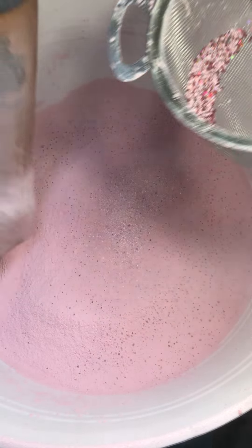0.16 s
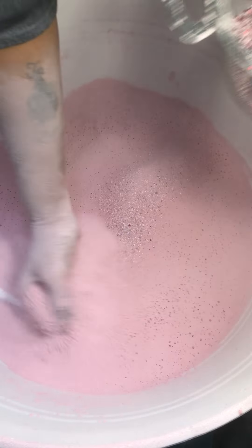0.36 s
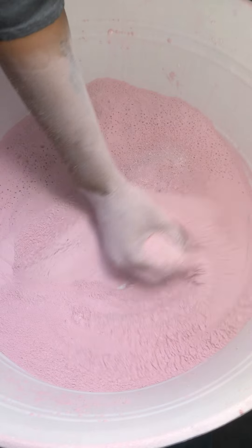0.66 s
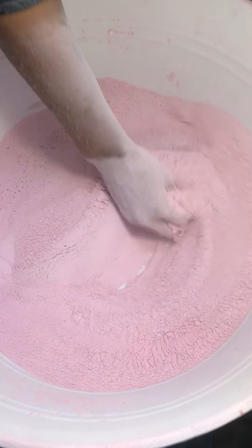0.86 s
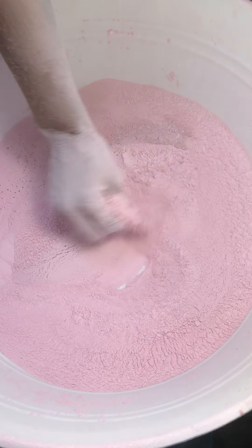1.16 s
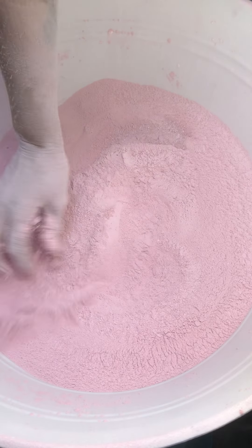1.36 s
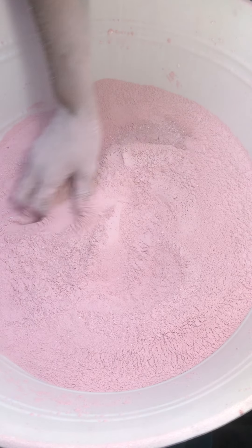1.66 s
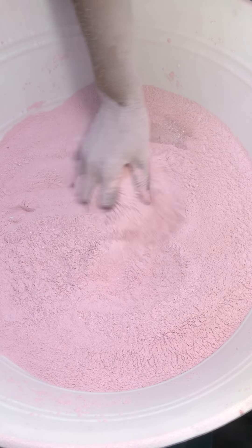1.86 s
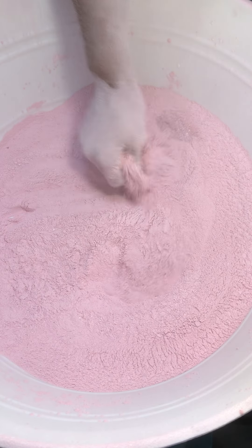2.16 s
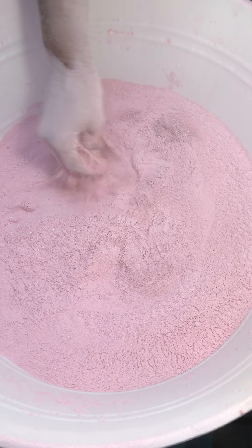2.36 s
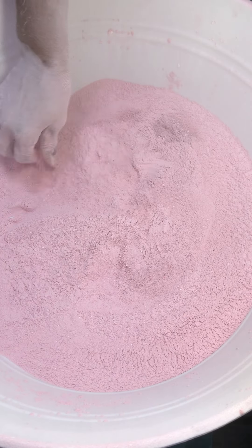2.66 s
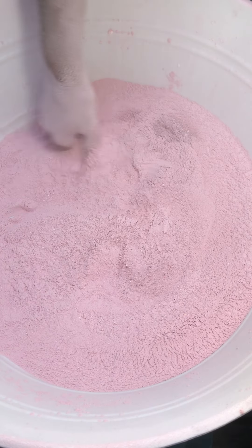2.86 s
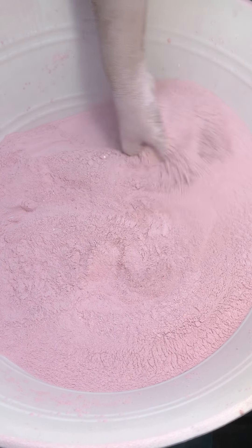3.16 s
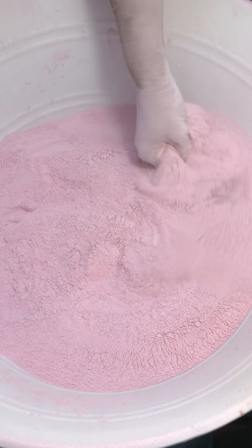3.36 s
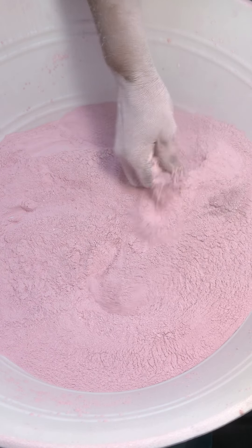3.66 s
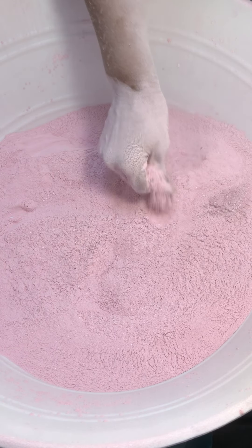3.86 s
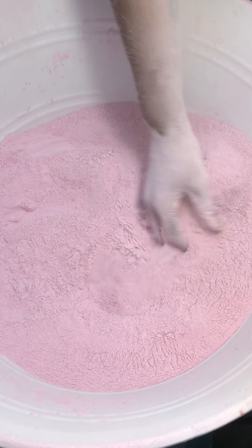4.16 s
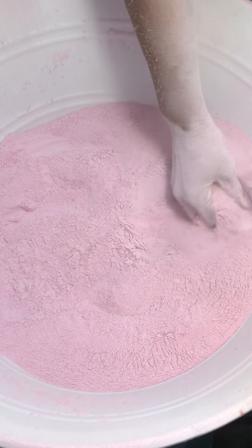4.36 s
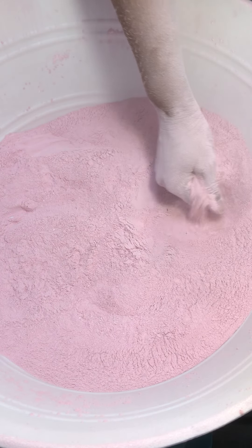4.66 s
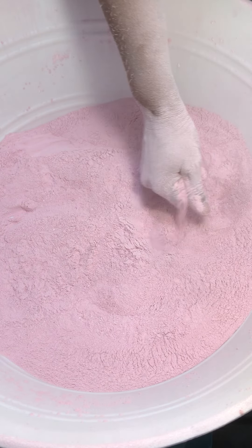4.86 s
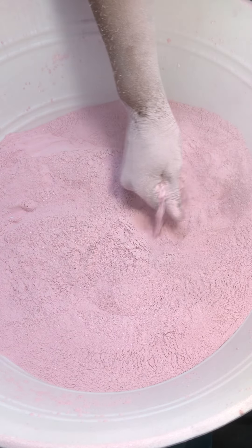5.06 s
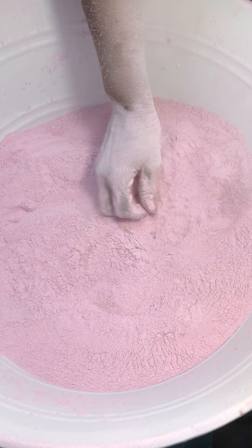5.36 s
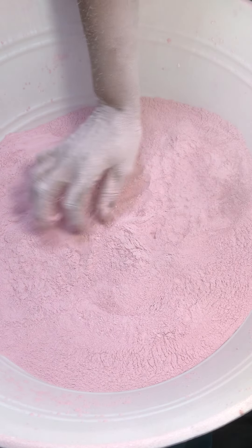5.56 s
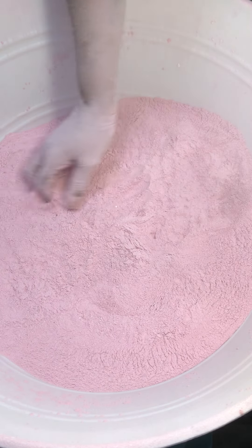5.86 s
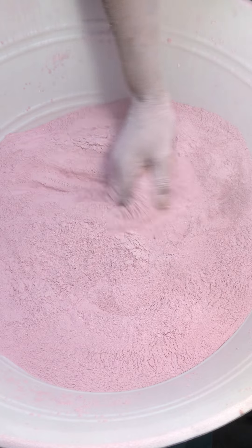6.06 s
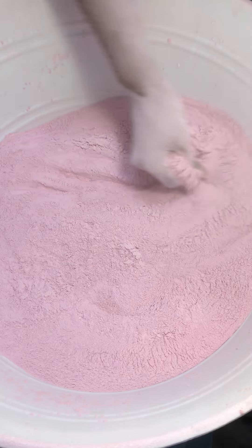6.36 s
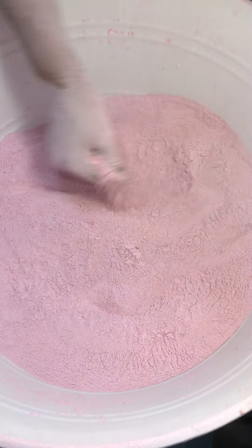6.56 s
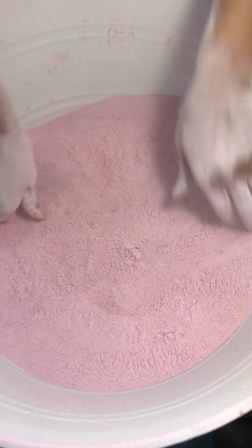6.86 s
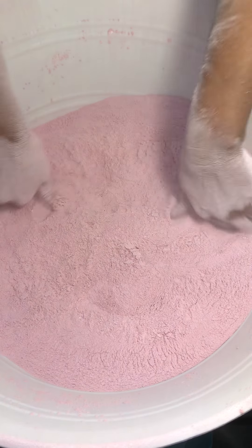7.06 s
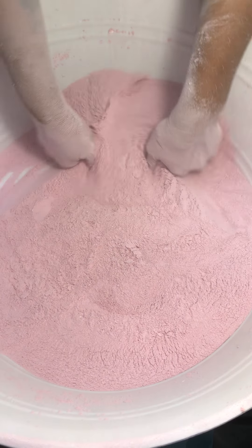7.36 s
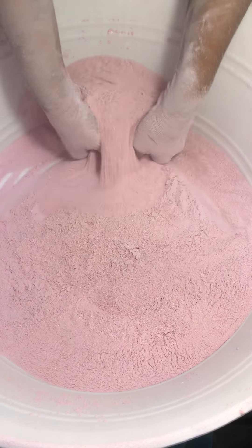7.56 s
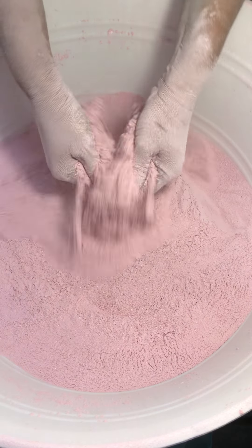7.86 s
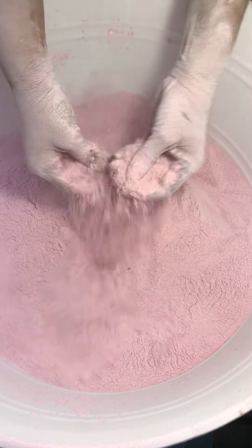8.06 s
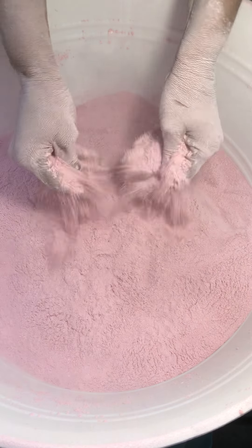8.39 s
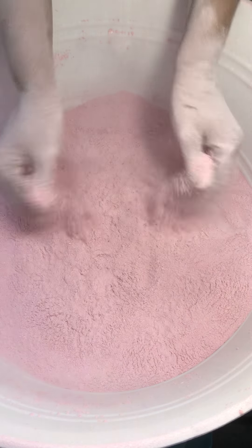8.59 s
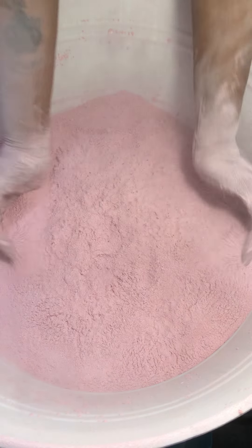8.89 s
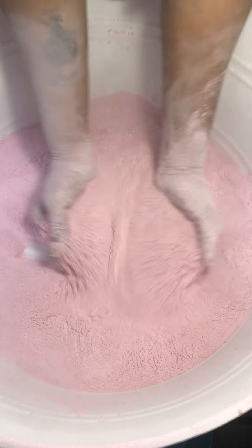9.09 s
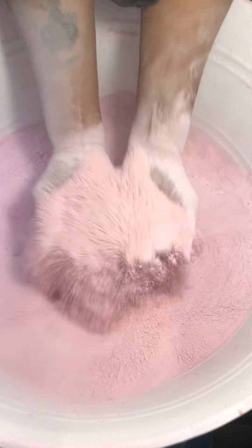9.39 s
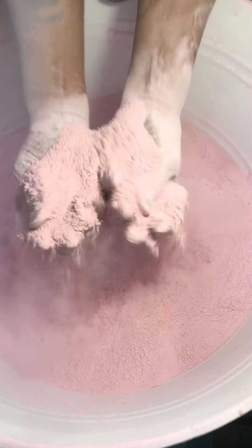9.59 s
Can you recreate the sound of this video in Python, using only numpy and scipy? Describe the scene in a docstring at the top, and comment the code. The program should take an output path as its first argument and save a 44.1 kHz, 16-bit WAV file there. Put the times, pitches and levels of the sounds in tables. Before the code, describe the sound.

Soft, gritty swishes of powder stirred by hand in a plastic tub, as a metal sieve rattles and knocks hard once midway.

```python
"""Chalk powder in a plastic basin

Close by, hands stir, scoop and crumble fine chalk: stick-slip friction hisses and scrapes, lumps tick,
and knuckles excite the damped modes of the wide basin. Further off a metal sieve is moved, knocked hard
and set down, rattling and ringing. The hard-walled room reverberates and hums; its floor rumbles."""
import sys
import numpy as np
from scipy import signal
from scipy.fft import rfft, irfft, next_fast_len
from scipy.io import wavfile
from scipy.ndimage import uniform_filter1d, map_coordinates

SR = 44100
rng = np.random.default_rng(int(sys.argv[2]) if len(sys.argv) > 2 else 0)


def persist_wave(psi):
    """Save psi, clipped to +-1, as 16-bit WAV."""
    counts = np.round(np.clip(psi, -1, 1) * 32767).astype(np.int16)
    wavfile.write(sys.argv[1], SR, np.atleast_2d(counts).T)


N = 429082


def amp(db):
    """Amplitude ratio of a level in dB."""
    return 10 ** (np.asarray(db) / 20)


def unit(x):
    """Normalisation to rms 1."""
    return x / np.sqrt(np.mean(x ** 2) + 1e-20)


def filtered(x, response):
    """Linear filtering: the spectrum of x times a complex frequency response."""
    size = next_fast_len(len(x) + 8192)
    return irfft(rfft(x, size) * response(np.fft.rfftfreq(size, 1 / SR)), size)[:len(x)]


def coloured(x, spectrum):
    """Spectral shaping by (f/Hz, level/dB) points on a log frequency axis, at rms 1."""
    hz, db = np.transpose(spectrum)
    return unit(filtered(x, lambda f: amp(np.interp(np.log(f + 1), np.log(hz + 1), db))))


def wobble(rate):
    """Smooth random modulation with rate knots a second."""
    knots = rng.standard_normal(int(N * rate / SR) + 4)
    return map_coordinates(knots, [np.arange(N) * rate / SR])


def add(track, s, sound):
    """Superposition of a sound on the track at s seconds."""
    part = track[round(s * SR):][:len(sound)]
    part += sound[:len(part)]


def grit(share, spread_db, patchy_db):
    """Granular noise: scattered louder grains, with gain patchy in time and frequency."""
    grains = rng.standard_normal(N) * amp(spread_db * rng.random(N) * (rng.random(N) < share))
    spectra = signal.stft(grains, nperseg=512)[2]
    patches = uniform_filter1d(uniform_filter1d(rng.standard_normal(spectra.shape), 7, 0), 8, 1)
    return signal.istft(spectra * amp(patchy_db * unit(patches)), nperseg=512)[1][:N]


def swells(rows):
    """Incoherent addition: the gain of (t/s, rise/s, hold/s, fall/s, level/dB) swells summed in power."""
    fade_db = -27.5  # one rise before and one fall after the hold
    t = np.arange(0, N / SR + .01, .002)
    power = 0
    for s, rise, hold, fall, db in rows:
        distance = np.maximum((s - t) / abs(rise), (t - s - abs(hold)) / abs(fall))
        power += amp(db + np.clip(fade_db * distance, -120, 0)) ** 2
    return np.interp(np.arange(N) / SR, t, np.sqrt(power))


def basin(f):
    """Modal superposition: the plastic wall responds as a sum of broad resonances."""
    # f/Hz, bandwidth/Hz, level/dB
    modes = [(174, 59, -5), (212, 35, 1.5), (253, 40, -2.5), (317, 45, -2), (352, 50, -3.5), (420, 65, -4),
             (590, 81, -10.5)]
    return sum((-1) ** k * amp(db) * 1j * f * width / (hz * hz - f * f + 1j * f * width)
               for k, (hz, width, db) in enumerate(modes))


def hand_pressure():
    """Friction grows with load: gains of fine powder, skin, ploughing and wall, bass trailing treble."""
    # hand strokes: t/s at full pressure, rise/s, hold/s, fall/s, then level/dB of each of the four layers
    sweeps = [(0.0, .01, 0.049, 0.26, -71, -63, -64.5, -63),
              (0.194, 0.9, 0.055, 0.86, -58, -62.5, -60, -64.5),
              (0.546, 0.27, 0.2, 0.17, -68, -65, -62, -66),
              (0.742, 0.25, 0.034, 0.34, -59.5, -87, -59.5, -88),
              (0.845, 0.14, 0.084, .12, -77, -89, -59.5, -74), (1.173, .4, 0.052, 0.53, -84, -70, -79, -72),
              (1.615, 0.23, 0.062, 0.28, -59.5, -63, -61, -59.5),
              (1.739, 0.15, 0.029, 0.34, -61.5, -72, -57, -51.5),
              (2.106, 0.14, 0.049, 0.41, -62, -64.5, -61, -64.5),
              (2.468, 0.39, 0.11, 0.32, -76, -69, -60.5, -61.5),
              (2.718, .04, 0.18, 0.19, -68, -60.5, -59.5, -67),
              (2.897, 0.066, 0.15, .2, -60, -64.5, -58, -63), (3.23, 0.17, 1, .5, -89, -92, -73, -69.5),
              (3.847, 0.18, 0.047, 0.3, -66.5, -63.5, -66.5, -70.5),
              (4.102, 0.25, 0.14, 0.6, -68.5, -68, -61.5, -59),
              (4.426, 0.23, 0.086, 0.23, -68, -67.5, -64.5, -63.5),
              (4.663, .06, 0.12, 0.27, -68, -70, -62.5, -68),
              (4.824, .08, 0.028, 0.3, -66.5, -65.5, -52.5, -51),
              (4.989, .15, 0.35, 1, -65, -71, -56, -54.5), (5.864, 0.11, 0.069, 0.26, -57, -59, -62.5, -61),
              (6.015, 0.18, 0.037, 0.43, -63, -89.5, -57, -59.5),
              (6.394, 0.33, 0.19, 0.63, -81, -88, -75.5, -72),
              (6.52, 0.12, 0.072, 0.069, -68, -65.5, -87, -80.5),
              (6.891, 0.16, 0.087, .3, -60.5, -72, -59.5, -62),
              (7.084, 0.28, 0.35, .17, -57, -56.5, -57.5, -62),
              (7.846, 1, 0.075, 0.59, -83, -87, -71, -64.5),
              (8.449, 0.54, 0.089, .15, -76, -63.5, -79.5, -72),
              (8.914, 0.11, 0.11, 0.39, -61, -61.5, -59.5, -60.5),
              (9.092, 0.22, 0.091, 0.26, -60, -65, -60.5, -60),
              (9.486, 0.55, 0.18, 0.23, -79.5, -81, -76.5, -67.5)]
    # fingertips flicking powder off: t/s at peak, rise/s, fall/s, skin level/dB, fine powder level/dB
    flicks = [(1.11, 0.12, 0.074, -64, -66.5), (1.47, .02, 0.068, -72.5, -64.5),
              (4.135, .03, .06, -68, -60), (4.575, .01, .04, -68, -74), (1.177, .01, 0.13, -68, -63),
              (1.256, 0.013, 0.088, -75, -75), (1.33, 0.011, .12, -71, -69),
              (2.3, 0.084, 0.046, -57, -58.5), (2.368, 0.017, .06, -58, -64),
              (2.49, 0.067, 0.075, -51, -62), (2.6, 0.037, .05, -56.5, -68), (3.49, 0.085, .1, -70, -63.5),
              (3.635, 0.049, 0.084, -59, -62), (3.71, 0.042, 0.069, -68, -63.5),
              (3.94, 0.046, 0.07, -68, -77), (5.07, 0.034, 0.27, -52.5, -62), (5.7, .04, 0.053, -70.5, -83),
              (6.35, 0.046, .06, -81, -79), (6.63, .03, .03, -68, -71), (6.735, 0.012, .015, -76, -84.5),
              (7.76, .04, 0.043, -81, -72), (8.08, .015, .06, -61, -69), (8.565, .03, .03, -55.5, -76),
              (9.285, .03, .03, -68, -78), (9.41, 0.048, .03, -68, -72), (9.645, .02, .02, -74.5, -83.5),
              (9.71, 0.022, .03, -74, -78)]
    # delay of each layer, as a share of the stroke's rise
    lags = (0.0, -.05, 0.055, 0.13)
    # hold of each layer, as a share of the stroke's hold
    holds = (1.03, 0.93, 1.054, 1.2)
    layers = [[(s + lag * rise, rise, share * hold, fall, db[k]) for s, rise, hold, fall, *db in sweeps]
              for k, (lag, share) in enumerate(zip(lags, holds))]
    layers[0] += [(s, rise, 0, fall, fine_db) for s, rise, fall, _, fine_db in flicks]
    layers[1] += [(s, rise, 0, fall, skin_db) for s, rise, fall, skin_db, _ in flicks]
    return [swells(rows) for rows in layers]


def hand_strokes():
    """Stick-slip friction: grains slide under the hands, and the push drives the basin's modes."""
    # spectrum of rubbing skin: f/Hz, level/dB
    skin_spectrum = [(2500, -29), (5000, -4), (8000, 1.5), (11000, -3), (16000, 0.5)]
    # spectrum of ploughed powder: f/Hz, level/dB
    coarse_spectrum = [(350, -8.5), (700, 3), (1300, 3.5), (2500, -1), (4000, -14.5), (8000, -33.5),
                       (16000, -51.5)]
    # spectrum of fine powder: f/Hz, level/dB
    fine_spectrum = [(1200, -25.5), (2500, 0.5), (4000, 5.5), (6500, 0), (9000, -7.5), (10500, -16),
                     (16000, -33.5)]
    fine, skin, plough, load = hand_pressure()
    slip = wobble(35)  # shared by skin and powder
    rub = skin * amp(1.1 * slip + 1.5 * wobble(90)) * coloured(grit(.05, 12, 2.5), skin_spectrum)
    powder = amp(.8 * slip) * grit(share=0.018, spread_db=14, patchy_db=2.17)
    drag = plough * coloured(powder, coarse_spectrum) + fine * coloured(powder, fine_spectrum)
    wall = unit(filtered(amp(1.6 * wobble(40)) * rng.standard_normal(N), basin))
    return rub + drag + load * wall


def room_hum():
    """Stationary noise: the low hum and faint hiss of the room."""
    # background spectrum: f/Hz, level/dB
    spectrum = [(12, -53.5), (20, -17), (55, -13.5), (123, -1), (187, 5), (337, -11), (923, -13),
                (1530, -13.5), (3340, -23), (9400, -26), (11400, -30), (14700, -29.5), (16000, -30.5)]
    return amp(-68.5) * coloured(rng.standard_normal(N), spectrum)


def tap_ticks_and_squeak():
    """Damped oscillation: each burst decays around one sagging pitch; the shortest are mostly noise."""
    # a ringing tap of the sieve being set aside (0.126-0.157 s), chalk ticks, and a short, stuttering
    # squeak near 3 kHz (2.886-2.945 s): t/s, level/dB, f/Hz, T60/s
    bursts = [(.097, -58, 3670, .02), (.126, -37.5, 3000, 0.012), (.129, -39.5, 384, 0.069),
              (.131, -41, 747, 0.056), (.157, -39.5, 575, 0.037), (.254, -50, 4080, .02),
              (.848, -40, 1590, 0.026), (.875, -38.5, 1170, 0.029), (1.517, -50, 2980, 0.01),
              (2.687, -46, 1270, 0.037), (2.69, -44, 477, 0.04), (2.713, -50, 6600, 0.031),
              (2.75, -38, 870, 0.019), (2.808, -44.5, 1450, 0.046), (2.864, -41, 550, 0.032),
              (2.886, -41, 3200, 0.029), (2.892, -43, 3550, 0.026), (2.911, -36, 3100, 0.033),
              (2.923, -36, 2950, 0.042), (2.927, -39.5, 2750, 0.035), (2.933, -39, 2800, 0.032),
              (2.945, -43, 2900, 0.024), (2.93, -34.5, 1430, 0.022), (3.632, -49, 2260, 0.027),
              (4.693, -45, 2380, 0.029), (4.695, -46, 1000, 0.07), (5.876, -45, 4680, 0.037),
              (6.632, -50, 4630, 0.016), (8.02, -48.5, 7300, 0.011), (8.073, -49, 4660, 0.016),
              (8.911, -38.5, 4100, 0.012)]
    out, t = np.zeros(N), np.arange(SR // 8) / SR
    for s, db, hz, t60 in bursts:
        noise = unit(filtered(rng.standard_normal(len(t)), lambda f: (f * hz / (f * f + hz * hz)) ** 2.2))
        tone = np.sin(2 * np.pi * hz * t * (1 - 0.41 * t))
        noisiness = np.clip(.011 / t60, 0, 1)
        envelope = amp(db - 60 * t / t60) * (1 - np.exp(-t / 0.00028))
        add(out, s, envelope * ((1 - noisiness) * tone + noisiness * noise))
    return out


def reverberation(x):
    """Wall reflections form a diffuse, decaying field; air absorption takes the treble first."""
    hz, t, spectra = signal.stft(rng.standard_normal(SR), SR, nperseg=256)
    t60 = 1.0 / (1 + (hz[:, None] / 7500) ** 1.3)
    tail = signal.istft(spectra * amp(-60 * t / t60), SR, nperseg=256)[1]
    delayed = np.pad(x, (400, 0))
    return signal.fftconvolve(delayed, tail / np.linalg.norm(tail))[:N]


def dull_thumps():
    """Dispersion: bending waves run faster at high frequency, so each thump sweeps downwards."""
    # hands on the basin, and the low body of the sieve's knocks (4.151-4.49 s, 5.561 s):
    # t/s, peak level/dB, contact corner f/Hz
    blows = [(.585, -49, 724), (0.692, -59, 350), (1.462, -44, 1310), (1.469, -36.5, 1340),
             (1.718, -54, 400), (1.798, -41.5, 520), (1.831, -46, 350), (2.475, -49, 800),
             (2.6, -51.5, 350), (2.628, -50, 350), (4.151, -46.5, 350), (4.228, -37, 2400),
             (4.24, -36, 396), (4.291, -43.5, 350), (4.49, -53, 302), (5.561, -34, 2630), (5.6, -39.5, 486),
             (5.797, -34.5, 925), (5.824, -37.5, 704), (6.031, -46, 500), (6.245, -54, 350),
             (6.308, -59, 343), (6.919, -49.5, 700), (7.157, -43, 940), (7.312, -51, 503),
             (7.526, -49.5, 249), (8.842, -46.5, 995), (9.004, -67, 496), (9.109, -45.5, 797),
             (9.199, -46, 500), (9.386, -65.5, 603)]
    out, t = np.zeros(N), np.arange(SR // 4) / SR
    impulse = signal.unit_impulse(len(t))
    body = lambda f: (basin(f) + 0.28) * (1j * f / (110 + 1j * f)) ** 2
    dispersion = lambda f: np.exp(-2j * np.pi * 0.12 * (np.sqrt(f) - f / (2 * np.sqrt(2500))))
    for s, db, corner_hz in blows:
        soft_contact = lambda f: np.exp(-(f / corner_hz) ** 2) / (1 + 1j * f / corner_hz) ** 2
        hit = filtered(impulse, lambda f: body(f) * soft_contact(f) * dispersion(f))
        hit *= amp(-60 * t / 0.31)  # the powder damps the ring
        add(out, s, amp(db) * hit / np.abs(hit).max())
    return out


def floorboards():
    """Structure-borne sound: steps and shifts of weight swell a faint rumble in the floor."""
    # weight landing on the floor: t/s, level/dB
    steps = [(1.76, -65), (2.1, -72), (2.459, -59), (2.63, -58), (2.9, -74), (3.33, -75), (3.91, -76),
             (4.15, -69), (4.34, -57), (4.5, -56.5), (4.74, -56), (4.95, -61), (5.07, -60), (5.23, -61),
             (5.42, -50), (5.6, -56.5), (5.86, -56), (6.071, -58.5), (6.25, -61), (6.41, -69), (6.979, -77),
             (8.95, -84), (9.27, -70)]
    # spectrum of the boards: f/Hz, level/dB
    spectrum = [(25, -31.5), (50, -3), (70, 6), (100, 1), (140, -38)]
    rise_s, fall_s, rest_db = .12, 0.1, -80.5
    weight = swells([(s, rise_s, 0, fall_s, db) for s, db in steps]) + amp(rest_db)
    return weight * coloured(rng.standard_normal(N), spectrum)


def sieve_knocks():
    """Impacts rattle rim and mesh and excite the frame's modes; softer contact gives less treble."""
    # the sieve meeting something hard: t/s, level/dB, treble tilt/dB (negative is dull), rattle T60/s
    knocks = [(4.075, -51, -1, .12), (4.14, -45, -6, .12), (4.227, -35.5, -9.5, 0.28),
              (4.279, -40.5, -14, 0.31), (4.48, -40.5, -11, 0.15), (4.69, -50.5, -3, 0.089),
              (4.829, -38, -7, .14), (4.949, -42, -5, 0.25), (5.036, -34.5, -16, 0.082),
              (5.062, -29, -7.5, 0.45), (5.106, -29.5, -5, .1), (5.128, -24.5, -6, 0.22),
              (5.17, -3, 0.56, 0.09), (5.184, -7, -1, 0.13), (5.203, -17.5, -3, 0.31),
              (5.363, -31, -27, 0.13), (5.562, -27, -8.5, 0.17)]
    # modes of the free frame: f/Hz, level/dB, T60/s
    modes = [(285, -8, 0.26), (547, -8.5, .12), (675, -10, .12), (738.4, -8, 0.085), (1365, -11, 0.082),
             (1390, -4, 0.052), (1457, -4, 0.36), (1713, -14, 0.066), (2885, -9.5, .08), (5880, -8, 0.036)]
    # spectrum of rim and mesh: f/Hz, level/dB
    clatter = [(90, -45.5), (170, -19.5), (290, -3.5), (550, -7.5), (850, -7.5), (1450, -2.5), (2200, -4.5),
               (3300, -3), (6000, -5), (9500, -8.5), (11000, -16.5), (16000, -20)]
    out, t = np.zeros(N), np.arange(SR // 2) / SR
    for s, db, tilt_db, t60 in knocks:
        ring = sum(amp(level + rng.normal(0, 1) - 60 * t / mode_t60)
                   * np.sin(2 * np.pi * hz * t + rng.uniform(0, 2 * np.pi))
                   for hz, level, mode_t60 in modes)
        ring *= amp(-60 * (t / 0.2) ** 2)  # the gripping hand soon damps the frame
        rattle = amp(-60 * t / t60) * coloured(rng.standard_normal(len(t)), clatter)
        snap = 0.95 * amp(-60 * t / 0.016) * np.diff(rng.standard_normal(len(t) + 1))
        hardness = amp(0.4 * tilt_db)
        tilt = lambda f: amp(tilt_db * (np.log2(1 + (f / 700) ** 2) / 2) ** 1.29)
        blow = filtered(rattle + hardness * (snap + 0.39 * ring), tilt)
        rise_s = 0.00093 * amp(-.6 * tilt_db)  # soft contacts build up more slowly
        add(out, s, amp(db - 9.5) * (1 - np.exp(-t / rise_s)) * blow / np.std(blow[:SR // 100]))
    return out


def crumbling():
    """Brittle fracture: pressed lumps break into a bright, gritty trickle."""
    # fingers crushing lumps: t/s at full pressure, rise/s, hold/s, fall/s, level/dB
    pinches = [(7.975, 0.27, .015, 0.026, -70.5), (8.016, .015, .01, 0.086, -70),
               (8.076, 0.017, 0.1, .05, -67.5), (8.21, 0.078, 0.054, .03, -59),
               (8.3, 0.018, 0.017, .05, -57.5), (8.35, .03, .005, 0.057, -63.5),
               (8.4, 0.08, 0.081, .1, -59.5), (8.46, 0.35, 0.025, 0.16, -57.5),
               (8.53, 0.046, 0.027, .05, -66.5)]
    # spectrum of breaking lumps: f/Hz, level/dB
    spectrum = [(1000, -34.5), (2200, -8), (3500, -5), (6500, -3.5), (9000, -6), (11000, -14),
                (16000, -10.5)]
    envelope = swells(pinches) * amp(1.3 * wobble(110))
    return envelope * coloured(grit(share=.04, spread_db=16.5, patchy_db=0.5), spectrum)


def scene():
    """Superposition of the direct sounds and the reverberation of the transients, in mono."""
    handling, knocks = dull_thumps() + tap_ticks_and_squeak(), sieve_knocks()
    direct = hand_strokes() + crumbling() + floorboards() + handling + knocks
    reflected = reverberation(amp(-10.5) * handling + amp(-14.0) * knocks)
    return (direct + reflected + room_hum())[None]


def record(dry):
    """Band limiting: a steep low-pass with a raised-cosine edge."""
    top_hz = 15830
    edge = lambda hz: np.sin(np.pi / 2 * np.clip((top_hz + 100 - hz) / 200, 0, 1)) ** 2
    return filtered(dry[0], edge)[None]


dry = scene()
out = record(dry)
persist_wave(out)
```